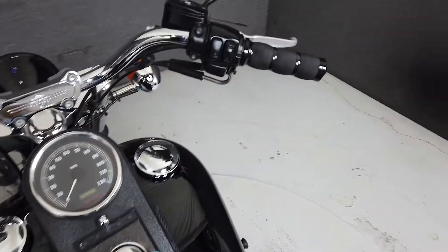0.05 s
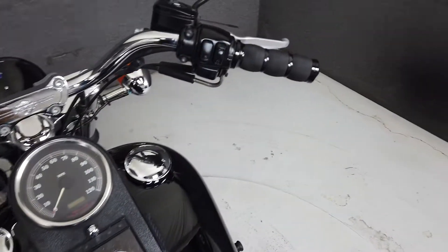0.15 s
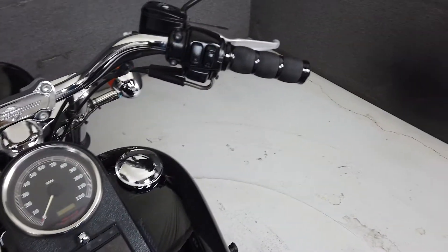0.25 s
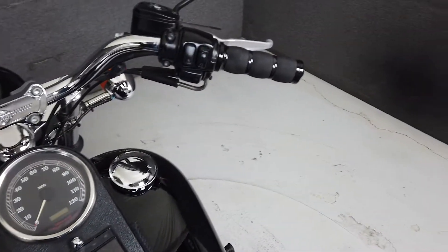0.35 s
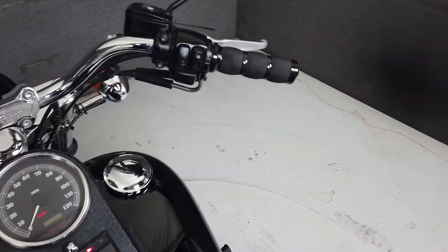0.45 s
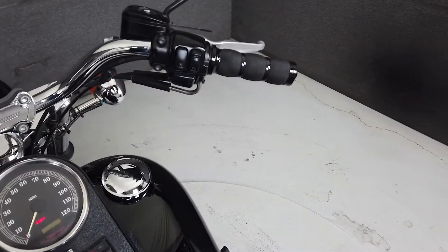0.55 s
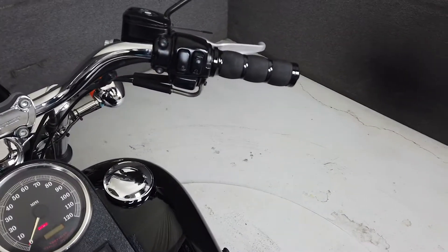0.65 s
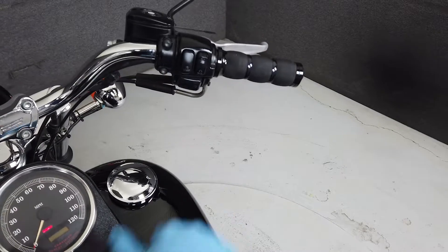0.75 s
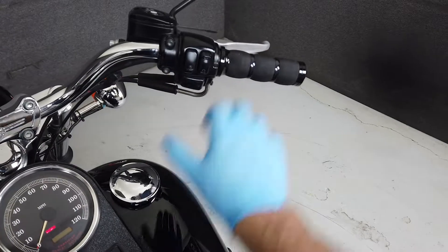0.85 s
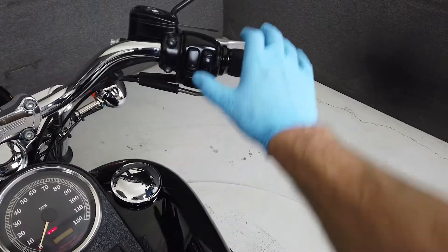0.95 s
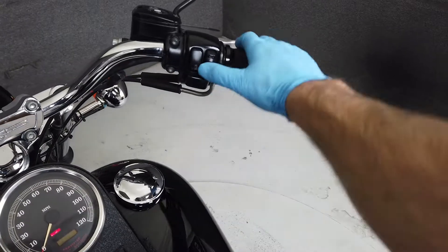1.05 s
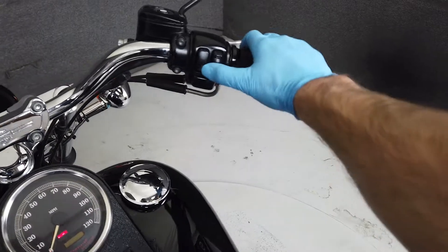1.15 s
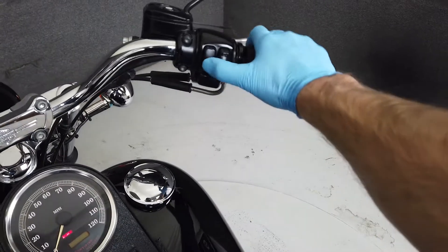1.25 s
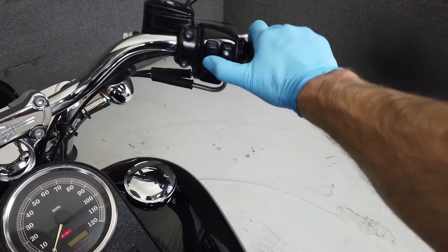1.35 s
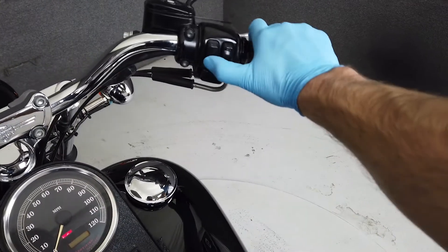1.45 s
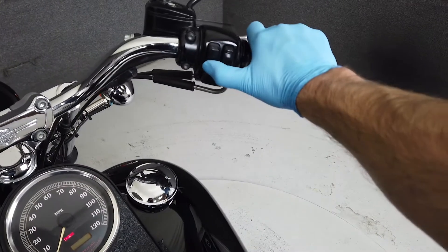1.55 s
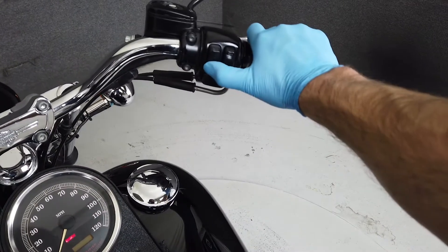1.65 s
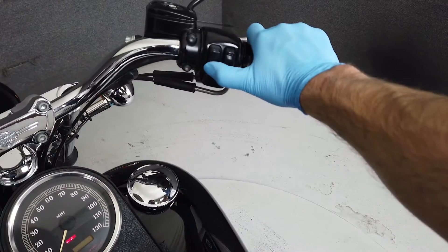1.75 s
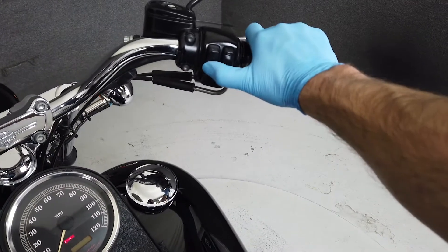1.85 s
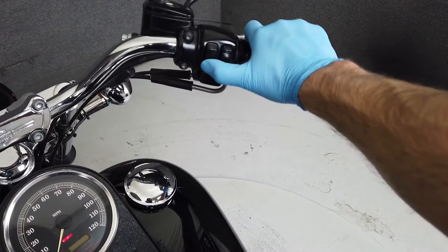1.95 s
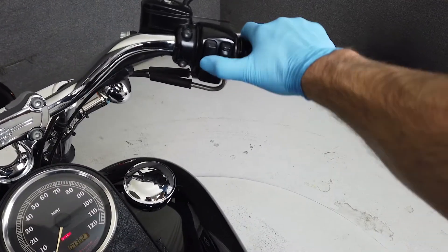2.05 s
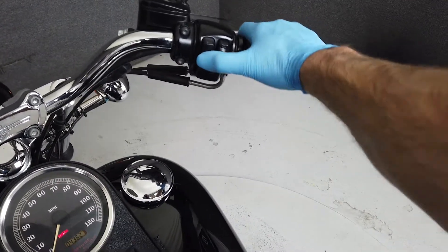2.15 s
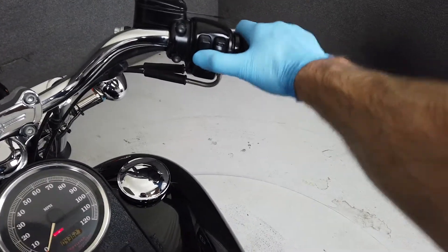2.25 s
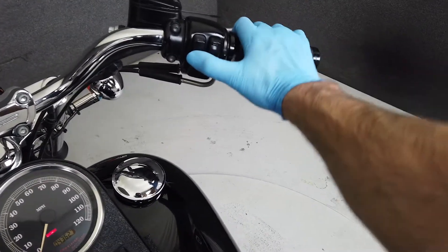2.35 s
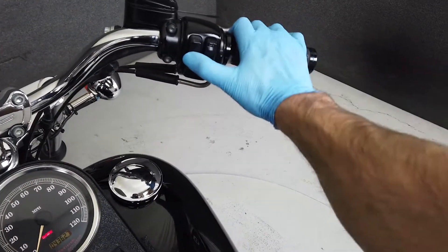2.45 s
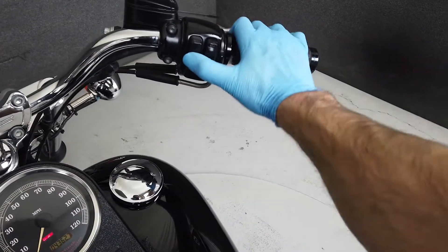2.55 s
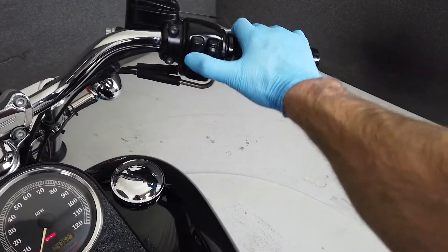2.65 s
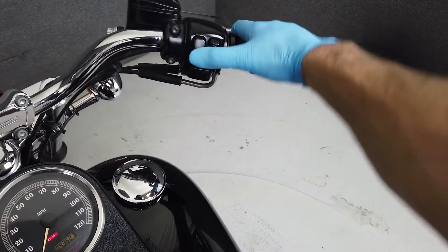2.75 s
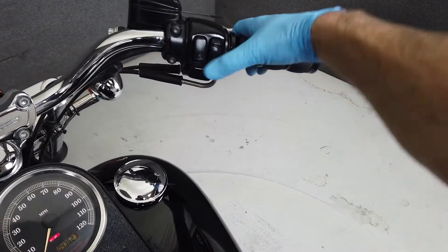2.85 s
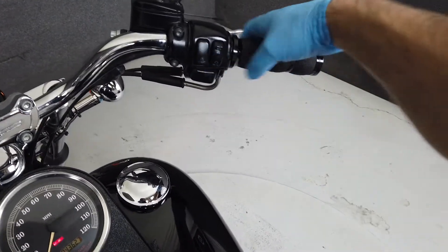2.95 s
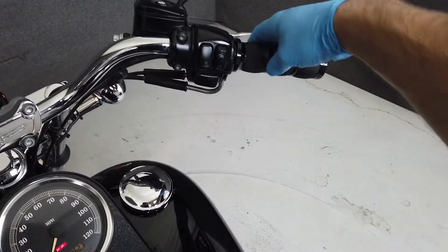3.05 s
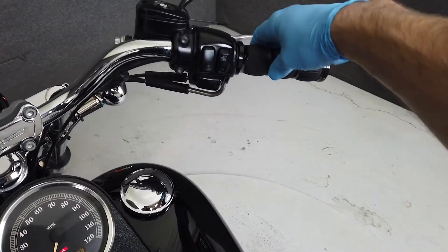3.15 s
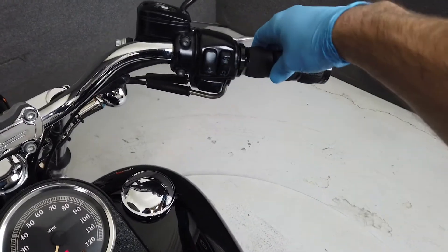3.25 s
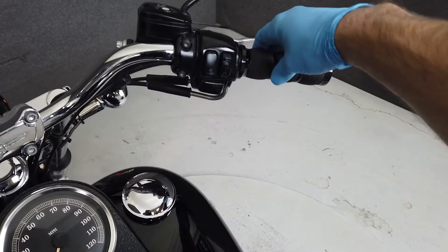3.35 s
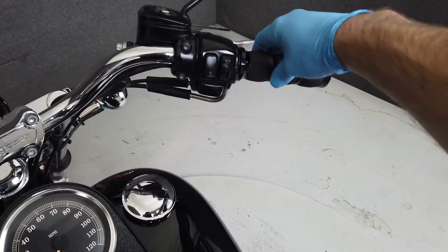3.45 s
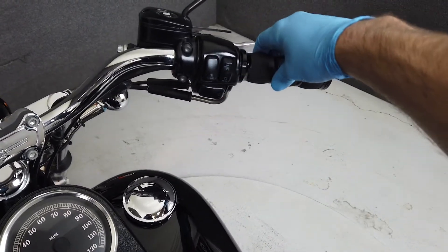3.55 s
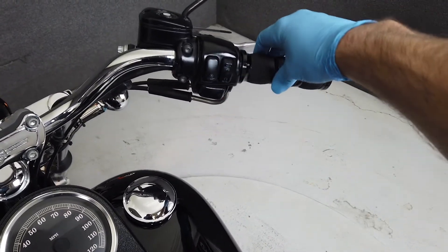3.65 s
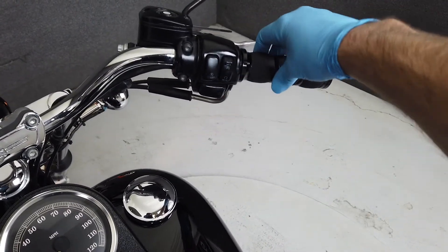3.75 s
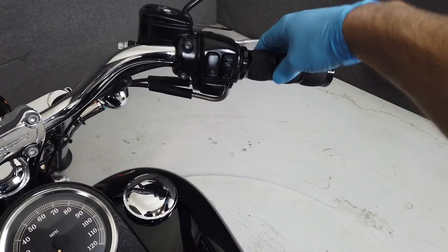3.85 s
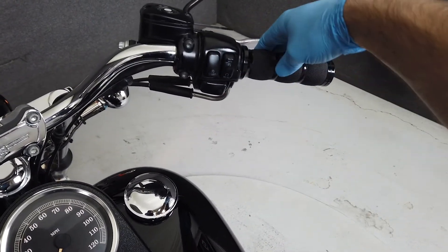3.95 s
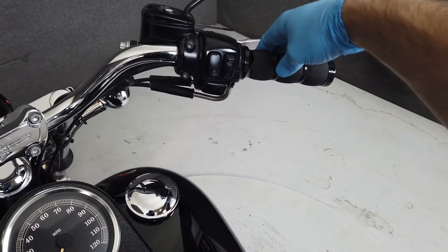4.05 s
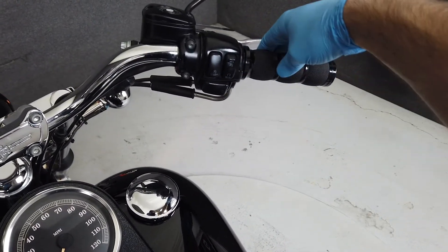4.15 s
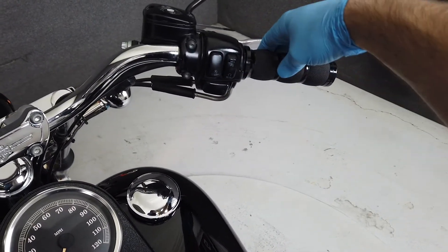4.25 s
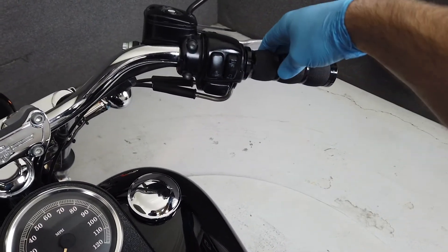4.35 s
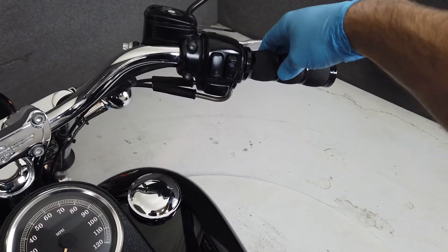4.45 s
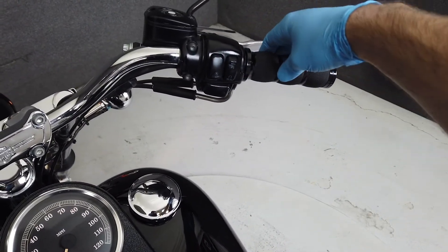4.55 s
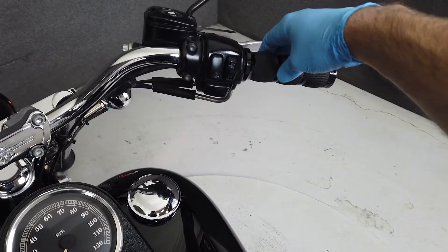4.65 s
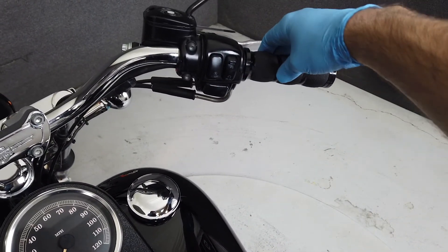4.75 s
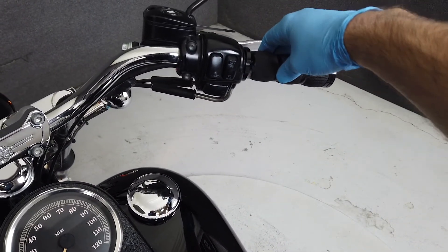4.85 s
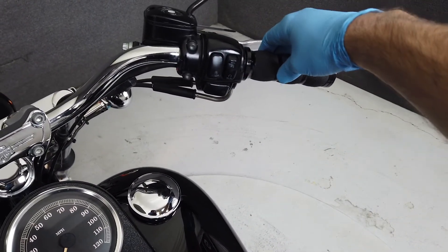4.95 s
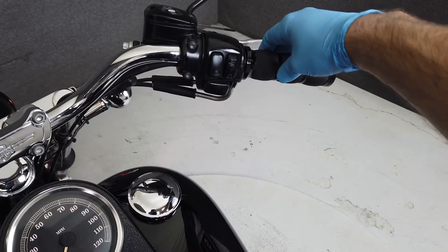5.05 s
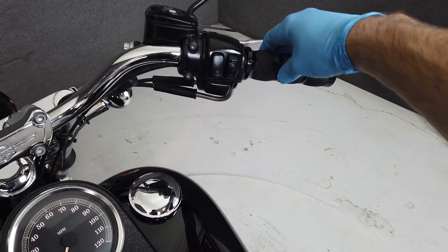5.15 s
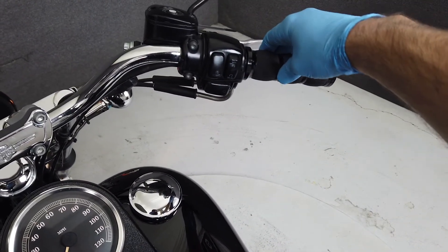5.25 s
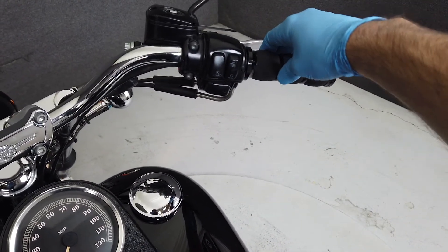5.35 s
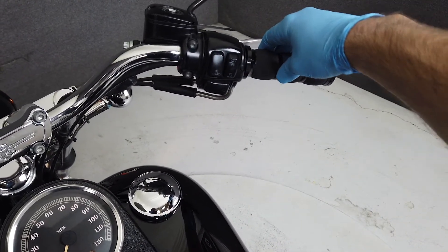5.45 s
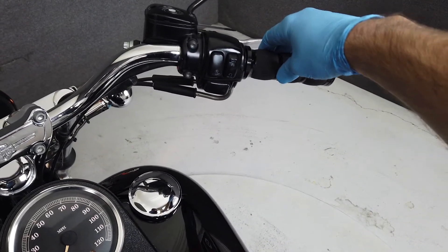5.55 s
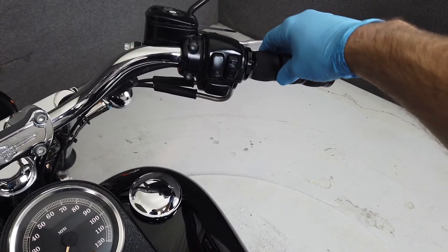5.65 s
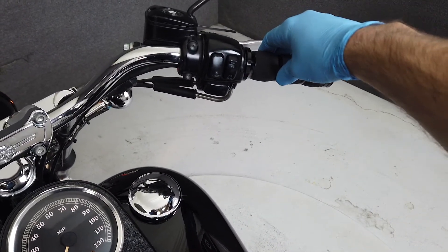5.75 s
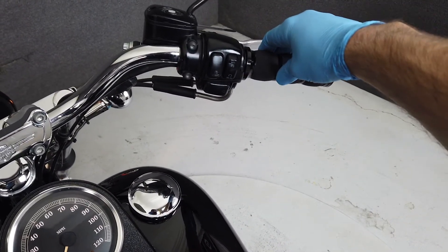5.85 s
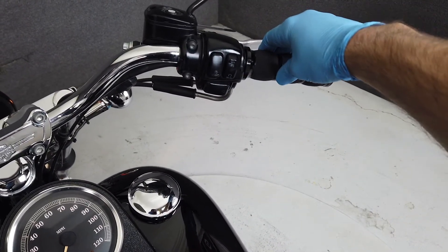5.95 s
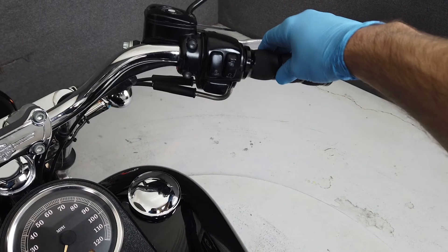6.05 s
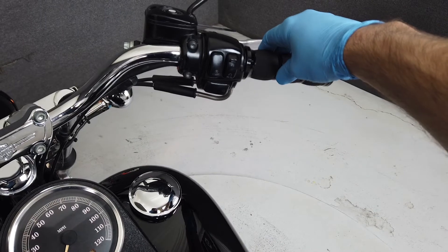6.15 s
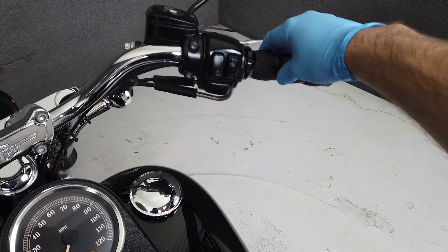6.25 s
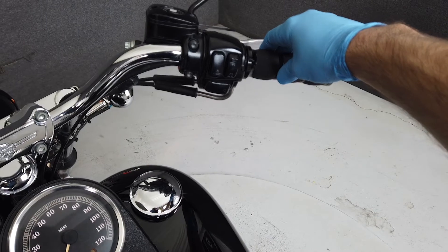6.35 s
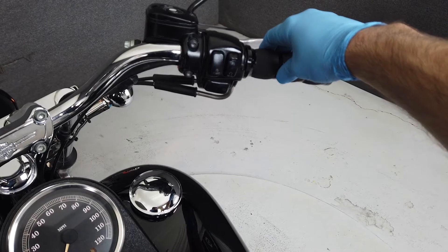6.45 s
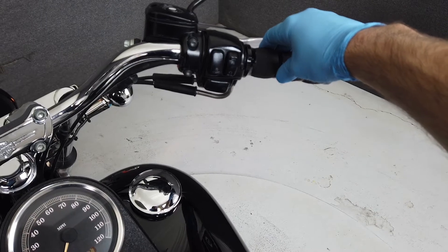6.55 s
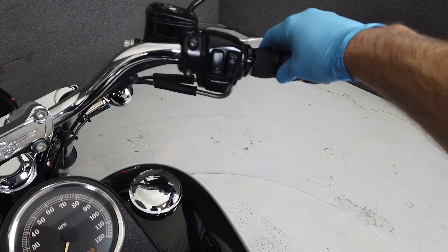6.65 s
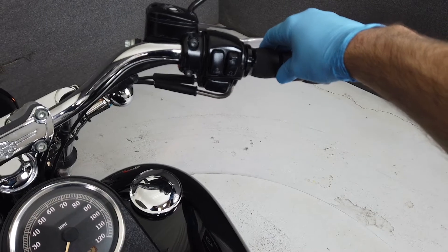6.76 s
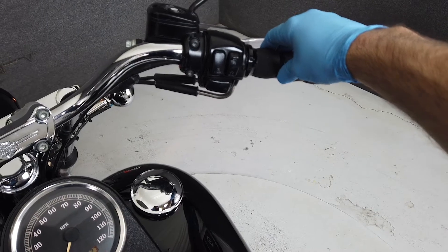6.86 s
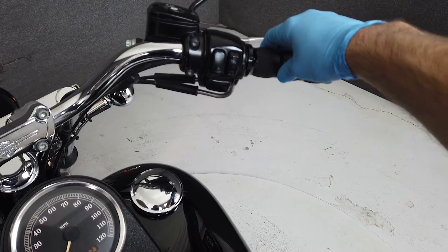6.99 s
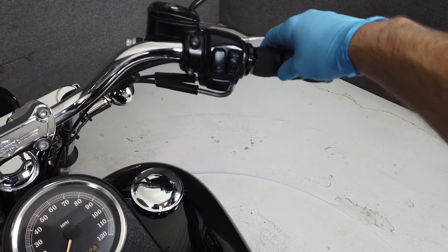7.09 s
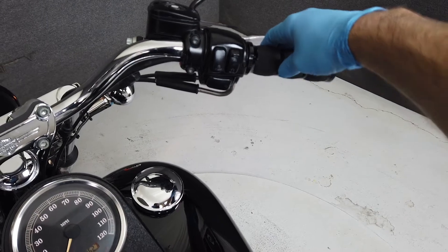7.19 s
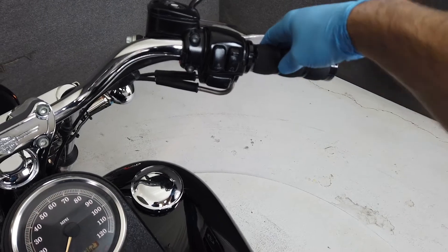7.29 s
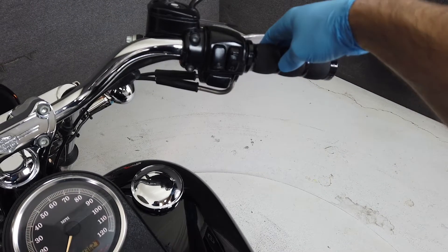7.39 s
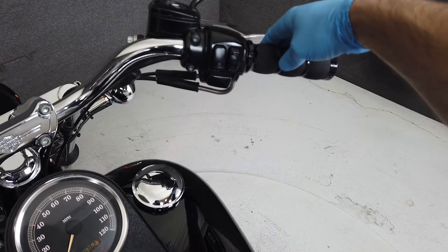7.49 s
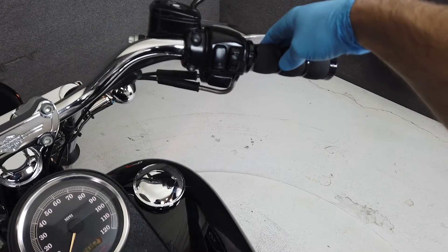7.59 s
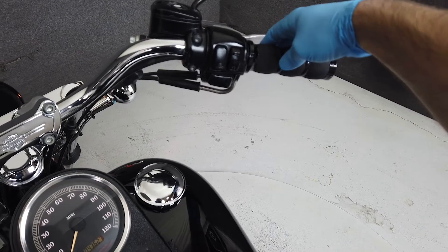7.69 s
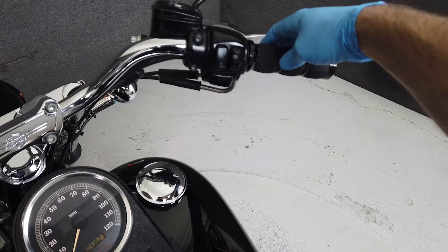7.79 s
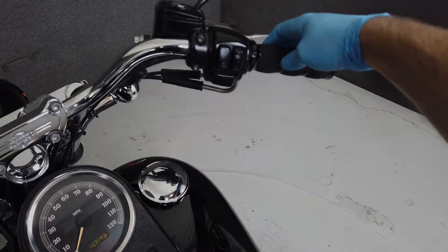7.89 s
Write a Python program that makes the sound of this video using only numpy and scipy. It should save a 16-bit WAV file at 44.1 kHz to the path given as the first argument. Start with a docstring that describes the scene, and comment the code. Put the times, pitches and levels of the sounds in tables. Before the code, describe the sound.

Heard close up from the rider's seat in a workshop, a big V-twin motorcycle is started. A faint click and a hissing pump whirr come first, then a clunk. The starter grinds for about a second until the engine fires with a loud, thumping exhaust. One short rev follows, then a slower one that misfires and rattles as it rises, and the engine falls back toward idle.

```python
"""Motorcycle starting up in a shop

A big V-twin heard from the saddle. The fuel pump primes with a whirr and a hiss, and something clunks on the bike.
The starter whines as it cranks; the engine coughs, catches and flares, then is revved twice, stumbling on the way up.
Every firing is a thump in the exhaust, a ring of pipe and room, and a bark of rushing gas made from noise.
"""
import sys
import numpy as np
from scipy import signal
from scipy.fft import rfft, irfft
from scipy.io import wavfile

SR = 44100
rng = np.random.default_rng(int(sys.argv[2]) if len(sys.argv) > 2 else 0)


def file_out(sig):
    """Save sig as 16-bit WAV at sys.argv[1]."""
    # one column per channel
    cols = np.atleast_2d(sig).T
    # limit, then scale
    lim = np.clip(cols, -1, 1)
    pcm = np.round(lim * 32767).astype(np.int16)
    wavfile.write(sys.argv[1], SR, pcm)


N = 349488   # length in samples
TIME = np.arange(N) / SR
HALF_SECOND = TIME[:SR // 2]

# In all tables of colour and of resonances, the dB only compare the rows with each other.


def from_db(db):
    """Turn decibels into a plain factor."""
    return 10 ** (np.asarray(db) / 20)


def rms_one(x):
    """Scale a sound to an average (rms) level of 1."""
    return x / np.sqrt(np.mean(x ** 2) + 1e-20)


def unit_energy(x):
    """Scale a short sound so that its squared samples add up to 1, averaged over channels."""
    return x / np.sqrt(np.mean(np.sum(x ** 2, axis=-1)))


def in_time(rows, at=TIME):
    """Read each column of a curve at the given times; the first column is seconds."""
    seconds, *columns = np.transpose(rows)
    return [np.interp(at, seconds, column) for column in columns]


def at_hz(points, hz):
    """Read a curve over frequency, with straight lines on a logarithmic scale."""
    point_hz, value = np.transpose(points)
    return np.interp(np.log(hz + 1), np.log(point_hz), value)


# How alike left and right are. Each row: frequency in Hz, likeness from 0 to 1.
LEFT_RIGHT_LIKENESS = [(60, .999), (250, 1), (500, 0.98), (1000, 0.89), (2000, 0.75), (4000, 0.14),
                       (8000, 0.4), (14000, 0.033)]


def noise(colour):
    """Stereo noise of a given colour, less alike in the two channels in most of the treble; rms 1."""
    hz = np.arange(N // 2 + 1) * SR / N
    mid, side = rfft(rng.standard_normal((2, N)))
    alike = np.clip(at_hz(LEFT_RIGHT_LIKENESS, hz), 0, 1)
    bass_fade = np.minimum(hz / colour[0][0], 1) ** 2   # fades below the first row
    gain = from_db(at_hz(colour, hz)) * bass_fade
    stereo = np.sqrt(1 + alike) * mid + np.sqrt(1 - alike) * side * [[1], [-1]]
    return rms_one(irfft(gain * stereo, N))


def drift(per_s):
    """Random wandering with a spread of 1, heading for a new value per_s times a second."""
    return rms_one(np.interp(TIME * per_s, np.arange(N // 10), rng.standard_normal(N // 10)))


def clicks(times, heights):
    """Single-sample pulses at the given seconds."""
    out = np.zeros(N)
    np.add.at(out, np.clip((np.asarray(times) * SR).astype(int), 0, N - 1), heights)
    return out


def convolve(x, response):
    """Start a copy of the response at every sample of x, scaled by it."""
    return signal.fftconvolve(np.atleast_2d(x), np.atleast_2d(response), axes=-1)[:, :N]


def dying(t60):
    """Half a second of decay that falls by 60 dB in t60 seconds."""
    return from_db(-60 * HALF_SECOND / t60)


def resonate(x, modes):
    """Side-by-side resonances of alternating sign, each given as Hz, width in Hz and dB."""
    out = 0
    for k, (hz, width_hz, db) in enumerate(modes):
        r = np.exp(-np.pi * width_hz / SR)
        gain = (-1) ** k * from_db(db) * (1 - r * r) / 2
        out = out + gain * signal.lfilter([1, 0, -1], [1, -2 * r * np.cos(2 * np.pi * hz / SR), r * r], x)
    return out


def swell_in_power(strikes, shape):
    """One envelope for many strikes; where they overlap their power adds up."""
    return np.sqrt(np.abs(convolve(strikes ** 2, shape ** 2)))


def bursts(strikes, shape, colour):
    """Fresh noise under the same envelope for every strike."""
    return noise(colour) * swell_in_power(strikes, shape)


def partials(phase, table, flicker_db):
    """Harmonics of a turning part, each flickering by itself; rms 1."""
    total = 0
    for multiple, db in table:
        level = from_db(db + flicker_db * drift(45))
        left_right_shift = rng.normal(0, 0.098 * multiple, (2, 1))
        total = total + level * np.sin(round(multiple) * phase + left_right_shift)
    return rms_one(total)


def in_shop(x, t60):
    """Many nearby surfaces return the sound, so gliding tones smear and roughen; rms 1."""
    flat = [(100, 0), (16000, 0)]
    return rms_one(convolve(x, noise(flat)[:, :SR // 2] * dying(t60)))


def switched_on(rows):
    """One while a motor's curve lasts, zero before and after."""
    return (TIME >= rows[0][0]) & (TIME <= rows[-1][0])


def ping(s, hz, db, rise_s, t60=0.17):
    """One pure tone swells and dies, as a struck or blown part rings."""
    envelope = (1 - np.exp(-HALF_SECOND / rise_s)) * dying(t60)
    return convolve(clicks([s], [from_db(db)]), envelope * np.sin(2 * np.pi * hz * HALF_SECOND))


def air_modes(modes, cylinder):
    """How the air rings after one firing of the front (0) or rear (1) cylinder."""
    ringing = 0
    for hz, t60, *shares in modes:
        tone = dying(t60) * np.sin(2 * np.pi * hz * HALF_SECOND)
        ringing = ringing + shares[cylinder] * unit_energy(tone)
    return ringing


# Colours of the shop air and of the rustle. Each row: frequency in Hz, level in dB per Hz.
SHOP_COLOUR = [(25, 6), (50, -8), (99, -4), (161, 2.5), (200, -2), (277, -3.5), (489, -3), (600, -9),
               (1000, -11.5), (1610, -14), (2550, -18.5), (4000, -23), (6000, -35.5), (11500, -39.5),
               (16000, -48)]
RUSTLE_COLOUR = [(25, -7), (45, -12), (65, -5), (100, -18), (160, -0.5), (270, -22.5), (420, -15.5),
                 (1000, -25.5), (2000, -27), (4400, -52)]
# Loudness of the rustle of handling. Each row: time in seconds, level in dB.
HANDLING_LEVEL = [(0, -37), (.07, -32.5), (.25, -38), (.5, -40), (.7, -46.5), (1.25, -83), (1.35, -41),
                  (1.45, -57), (1.6, -53)]


def background(hum_hz=160, hum_db=-54.5, air_db=-47.5):
    """Shop air is steady noise with a wavering hum; handling adds a low rustle."""
    waver_db, waver_per_s = 3.5, 25
    phase = 2 * np.pi * np.cumsum(hum_hz * (1 + 0.025 * drift(10))) / SR
    hum = from_db(hum_db + waver_db * drift(waver_per_s)) * np.sin(phase)
    rustle = from_db(in_time(HANDLING_LEVEL)[0]) * noise(RUSTLE_COLOUR)
    return from_db(air_db) * noise(SHOP_COLOUR) + hum + rustle


# The pump spins up, then slows as pressure builds.
# Each row: time in seconds, commutator rate in Hz, level in dB before the whirr and hiss are balanced.
PUMP_RUN = [(.05, 300, -64), (.066, 418, -38.5), (.14, 439, -35.5), (.3, 436, -39), (.42, 427, -43),
            (.55, 430, -50.5), (.59, 298, -59)]
# Whistles of the pump. Each row: multiple of the commutator rate, level in dB.
PUMP_WHISTLES = [(6, -15), (7, -8), (8, -5), (9, -10), (10, 1.5), (11, 6), (12, -9), (16, -2)]
# Colour of the hiss. Each row: frequency in Hz, level in dB per Hz.
PUMP_COLOUR = [(1060, -44), (1800, -16), (2010, -6), (2180, -11), (2590, 1.5), (2870, -10), (3320, -3),
               (4200, -1.5), (4800, 0), (5390, -10), (6900, -13), (8280, -18), (11100, -6.5), (12300, -16),
               (15100, -21), (16000, -29)]


def fuel_pump(buzz_depth=0.21):
    """The pump motor whirrs, and the hiss of fuel pulses at a quarter of its commutator rate."""
    whirr_db, hiss_db = -8.0, 0.0
    hz, db = in_time(PUMP_RUN)
    phase = 2 * np.pi * np.cumsum(hz * (1 + 0.0096 * drift(300))) / SR
    whirr = in_shop(partials(phase, PUMP_WHISTLES, flicker_db=2.5), t60=.2)
    hiss = rms_one((1 + buzz_depth * np.cos(phase / 4)) * noise(PUMP_COLOUR))
    return switched_on(PUMP_RUN) * from_db(db) * (from_db(whirr_db) * whirr + from_db(hiss_db) * hiss)


# Knocks of switch, clunk and solenoid. Each row: time in seconds, strength in dB.
KNOCK_STRIKES = [(.063, -20.5), (.076, -32), (.591, -1.5), (0.609, -12.5), (1.438, -42), (1.456, -10.5)]
# Ringing of the struck metal. Each row: frequency in Hz, level in dB, seconds to fall by 60 dB.
KNOCK_RINGING = [(281, -14, 0.33), (485, 5.5, 0.24), (635, 8, 0.14), (797, 1, 0.18), (995, 2, 0.2),
                 (1130, -13, 0.36), (1210, -5, 0.51), (1640, -23, 0.12), (1880, -9, 0.17), (2010, -3, 0.21),
                 (2720, -18, 0.32)]
# Colour of the knock's noise. Each row: frequency in Hz, level in dB per Hz.
KNOCK_COLOUR = [(88, -52), (150, -14), (196, -37), (262, -10.5), (556, -5), (624, -13), (883, -4.5),
                (972, -1.5), (1320, -16), (1700, -8.5), (2230, -19.5), (4050, -24), (6060, -38),
                (6680, -30.5), (15000, -41)]


def knocks(crack_db=-15.5, crack_t60=0.019, body_db=-22.0, body_t60=0.19,
           tail_db=-18.5, tail_t60=0.34, tail_hz=2000, modes_db=-13.0):
    """Metal parts knock: a crack, ringing modes and a dull tail in the shop."""
    at, db = np.transpose(KNOCK_STRIKES)
    strikes = clicks(at, from_db(db))
    ringing = 0
    for k, (hz, level_db, t60) in enumerate(KNOCK_RINGING):
        tone = np.sin(2 * np.pi * hz * HALF_SECOND)
        ringing = ringing + (-1) ** k * from_db(level_db) * dying(t60) * tone
    hit_shape = from_db(crack_db) * dying(crack_t60) + from_db(body_db) * dying(body_t60)
    hit = bursts(strikes, hit_shape, KNOCK_COLOUR)
    dull = signal.butter(2, tail_hz, fs=SR, output="sos")
    tail = signal.sosfilt(dull, bursts(strikes, from_db(tail_db) * dying(tail_t60), KNOCK_COLOUR))
    return hit + tail + from_db(modes_db) * convolve(strikes, ringing / np.abs(ringing).max())


# Tones of the pump's relay. Each row: frequency in Hz, level in dB.
RELAY_TONES = [(576, -37), (910, -40), (2110, -34.5)]


def pump_relay():
    """The pump's relay rings with the first knock, rising almost at once."""
    return sum(ping(KNOCK_STRIKES[0][0], hz, db, rise_s=0.00042) for hz, db in RELAY_TONES)


# Compression strokes that the starter labours against. Each row: bite in seconds, over the top in seconds,
# gear mesh rate in Hz at the bite, mesh rate in Hz at the top, gear level in dB at the top.
STARTER_STROKES = [(1.55, 1.635, 688.3, 540.8, -23.5), (1.95, 1.995, 524, 485, -29.5),
                   (2.07, 2.175, 456, 403, -30.5), (2.345, 2.45, 490, 410, -30.5),
                   (2.56, 2.6, 536.5, 548, -26.5)]


def starter_effort(inrush_s=0.017, coast_db=-37.0):
    """Rows (s, mesh Hz, gear dB, brush dB): run-up, a swell on each stroke, lighter between, then the coast."""
    on_s, run_up_s, coast_s = 1.437, 0.037, 0.49
    run_up_from_hz, run_up_to_hz, run_up_db, brush_db = 241, 415.3, -25.5, -30
    swell_db = 5.5   # the gears grow louder from bite to top
    freewheel_drop_db, freewheel_gain_hz, bite_s = 13.5, 14, 0.022   # light and fast just before a bite
    ease_s = .045    # past the top the gears quieten in this time, their pitch going on as before
    rows = [(on_s - inrush_s, run_up_from_hz, run_up_db + coast_db, brush_db + coast_db),
            (on_s, run_up_from_hz, run_up_db - swell_db, brush_db),
            (on_s + run_up_s, run_up_to_hz, run_up_db, brush_db)]
    for k, (bite, top, bite_hz, top_hz, db) in enumerate(STARTER_STROKES):
        light_db = db - swell_db
        sag_hz_per_s = (bite_hz - top_hz) / (top - bite)
        if k:
            rows.append((bite - bite_s, bite_hz + freewheel_gain_hz,
                         light_db - freewheel_drop_db, brush_db - freewheel_drop_db))
        rows += [(bite, bite_hz, light_db, brush_db),
                 (top, top_hz, db, brush_db),
                 (top + ease_s, top_hz - sag_hz_per_s * ease_s, light_db, brush_db - freewheel_drop_db / 2)]
    rows.append((top + coast_s, run_up_to_hz, db + coast_db, brush_db + coast_db))
    return sorted(rows)


# Gear whine. Each row: multiple of half the mesh rate, level in dB.
GEAR_WHINE = [(1, -4), (2, -1), (3, -4), (4, -3), (5, -3), (6, -2), (7, -3), (8, -3), (9, -5), (10, -4),
              (12, -5), (14, -5), (16, -6)]
# Resonances of the starter's housing. Each row: frequency in Hz, width in Hz, level in dB.
STARTER_HOUSING = [(444, 170, 7.5), (1005, 120, 7.5), (1500, 350, 7.5), (2900, 590, 2.5)]
# Colours of the grinding gears and of the brush hiss. Each row: frequency in Hz, level in dB per Hz.
GEAR_COLOUR = [(120, -41), (200, 4), (234, -17), (320, 4.5), (369, 0), (549, -4), (751, -18), (1180, -4),
               (1490, -15), (2700, -8), (6000, -15), (7800, -61), (13200, -120)]
BRUSH_COLOUR = [(3000, 10), (5000, -1), (7000, 0.5), (9500, 4.5), (11500, 5), (13000, -8), (16000, -11)]


def starter(brush_db=-7.5, grain_db=0.5, tooth_depth=0.79):
    """The gears whine and grind at the rate their teeth meet; the brushes hiss under load."""
    whine_db, echo_db, grind_db, wobble, smear_t60 = -3.0, -6.5, -8.0, .012, .08
    effort = starter_effort()
    mesh_hz, gear_db, hiss_db = in_time(effort)
    phase = 2 * np.pi * np.cumsum(mesh_hz * (1 + wobble * drift(150))) / SR
    whine = rms_one(resonate(partials(phase / 2, GEAR_WHINE, flicker_db=6.0), STARTER_HOUSING))
    teeth = (1 + tooth_depth * np.cos(phase)) * from_db(grain_db * drift(240))
    grind = rms_one(teeth * noise(GEAR_COLOUR))
    echo = in_shop(whine, smear_t60)
    gears = from_db(whine_db) * whine + from_db(echo_db) * echo + from_db(grind_db) * grind
    hiss = rms_one(teeth * noise(BRUSH_COLOUR))
    return switched_on(effort) * (from_db(gear_db) * gears + from_db(hiss_db + brush_db) * hiss)


# Colour of rushing gas, also the grit of the rasps. Each row: frequency in Hz, level in dB per Hz.
GAS_COLOUR = [(200, 6), (300, 3.5), (338, 1.5), (395, 3.5), (640, 5), (708, -5), (750, 0.5), (1000, -2.5),
              (1550, -1), (1850, -6), (2400, -4.5), (2900, -6.5), (3600, -9), (5500, -18), (8500, -19),
              (11300, -14), (13000, -21.5), (16000, -29)]
# Rasps of the starter drive. Each row: start in seconds, length in seconds, frequency in Hz, width in Hz,
# level in dB before a smooth swell and fade.
DRIVE_RASPS = [(1.458, 0.036, 960, 500, -24), (1.613, 0.052, 1010, 450, -26),
               (2.136, 0.065, 1800, 400, -38), (2.138, 0.065, 2950, 450, -39),
               (2.426, 0.054, 1620, 200, -32), (2.42, 0.061, 2900, 400, -39),
               (2.649, 0.031, 2360, 200, -22)]


def rasps():
    """The starter drive gnashes as it takes up load, and its clutch rasps as the engine runs away from it."""
    out, grit = np.zeros((2, N)), noise(GAS_COLOUR)
    for s, length_s, hz, width_hz, db in DRIVE_RASPS:
        span = slice(int(s * SR), int((s + length_s) * SR))
        rasp = rms_one(resonate(grit[:, span], [(hz, width_hz, 0)]))
        out[:, span] += from_db(db) * rasp * np.sin(np.linspace(0, np.pi, rasp.shape[1]))
    return out


# Engine speed from the moment it catches. Each row: time in seconds, four-stroke cycles per second.
ENGINE_SPEED = [(2.647, 8.73), (2.82, 18.33), (3.069, 14.55), (3.258, 10.42), (3.386, 8.56), (3.765, 15.83),
                (3.944, 22.79), (4.131, 20.17), (4.503, 11.35), (4.793, 8.91), (5.095, 11.64),
                (5.444, 11.43), (5.589, 13.17), (5.782, 12.71), (6.389, 13.99), (7.054, 19.14),
                (7.282, 23.74), (7.92, 11.17)]
CATCH_S = ENGINE_SPEED[0][0]
IDLE_HZ = 12   # cycles per second


def speed_at(s):
    """Engine speed in cycles per second; zero before it catches."""
    return np.interp(s, *np.transpose(ENGINE_SPEED), left=0)


# The flare on catching and two twists of the throttle.
# Each row: opens in seconds, time to open fully in seconds, shuts in seconds, opening from 0 to 1.
THROTTLE_TWISTS = [(2.6, .02, 2.886, 0.86), (3.42, 0.3, 3.997, 1), (4.84, 0.25, 7.25, 1.0)]


def throttle_at(s, release_s=0.0084):
    """The throttle is rolled on and springs shut; 0-1."""
    total = 0
    for opens, roll_s, shuts, opening in THROTTLE_TWISTS:
        rolled_on = np.clip((s - opens) / roll_s, 0, 1)
        total = total + opening * rolled_on * np.exp(-np.maximum(s - shuts, 0) / release_s)
    return np.clip(total, 0, 1)


# How loudness follows throttle and speed, for thump, pipe ring and bark. Each holds: dB at idle speed when shut,
# its rise in dB per octave of speed, dB at idle speed when open, its rise in dB per octave.
THUMP_LOUDNESS = (-22.5, 10.5, -17, 6)
RING_LOUDNESS = (-34, 14, -27, 13)
BARK_LOUDNESS = (-42, 12, -27.3, 3.5)
# Misfires, mostly of the rear cylinder, while the revs hang low. Each row: time in seconds, bark change in dB.
WEAK_FIRINGS = [(3.385, -2), (3.613, 0), (5.132, -6), (5.305, -43), (5.392, -27), (5.713, -29),
                (5.757, -29), (5.99, -10), (6.023, -27), (6.098, -31), (6.172, -5.5), (6.318, -12),
                (6.593, -4), (7.667, -7), (7.835, -15)]
# Firings with a level of their own, mostly harder: on catching, as the throttle opens, after misfires.
# Each row: time in seconds, bark change in dB.
UNUSUAL_FIRINGS = [(2.647, 10.5), (2.691, 6.5), (2.736, 9.5), (3.278, 6.5), (3.434, 8), (3.49, 8.5),
                   (3.654, -0.5), (4.696, 10), (4.851, 9), (5.005, 6), (5.046, -0.5), (5.222, -0.5),
                   (5.353, -2), (5.441, -1), (5.525, 2.5), (5.679, 2), (5.948, 2.5), (6.064, 3.5),
                   (6.14, 1), (6.359, 0), (6.39, 3.5), (6.499, 5.5), (6.867, 4.5)]


def firing_levels(at, rear):
    """(thump, ring, bark) dB of each firing: set by throttle and speed, with changes for single firings."""
    rear_weak_db, rear_clears_octaves = -3.5, 0.26   # weak rear burning at idle speed; gone this far above it
    throttle, octaves = throttle_at(at), np.log2(speed_at(at) / IDLE_HZ)
    levels = []
    for shut_db, shut_rise, open_db, open_rise in (THUMP_LOUDNESS, RING_LOUDNESS, BARK_LOUDNESS):
        when_shut, when_open = shut_db + shut_rise * octaves, open_db + open_rise * octaves
        levels.append((1 - throttle) * when_shut + throttle * when_open)
    db = np.array(levels)
    db[2] += rear_weak_db * rear * throttle * np.clip(1 - octaves / rear_clears_octaves, 0, 1)
    # the thump takes only a share of each change, and the ring half of any rise
    for table, thump_share in ((WEAK_FIRINGS, 0.28), (UNUSUAL_FIRINGS, 0.33)):
        for when, change_db in table:
            ring_share = 1 if change_db < 0 else .5
            db[:, np.argmin(np.abs(at - when))] += change_db * np.array([thump_share, ring_share, 1])
    return db


# Coughs and compression puffs while cranking, all shifted by cough_db below.
# Each row: time in seconds, thump in dB, pipe ring in dB, bark in dB.
CRANKING_COUGHS = [(1.709, -22.5, -52, -22.5), (1.737, -22, -25, -27.5), (1.787, -22.5, -29, -25.5),
                   (1.911, -30.5, -51, -40.5), (2.033, -34, -44, -40), (2.212, -20.5, -31.5, -25.5),
                   (2.312, -31.5, -40.5, -62), (2.482, -22.5, -59, -27), (2.532, -40, -40, -33),
                   (2.577, -25, -27, -25.5), (2.61, -46, -43, -40)]


def firings(rear_bark_db=2.5, bark_spread_db=2.5, cough_db=-14.5):
    """Times, cylinder and (thump, ring, bark) strengths; the V makes the beat uneven, and revs steady it."""
    spread_db, jitter_s = 1.8, .00025
    rear_lag = 315 / 720   # of a cycle, behind the front cylinder
    running = TIME[TIME >= CATCH_S]
    turned = np.cumsum(speed_at(running)) / SR   # cycles so far
    number = np.arange(2 * int(turned[-1]) + 1)
    rear = number % 2
    at = np.interp(number // 2 + rear * rear_lag, turned, running)
    speed = speed_at(at)
    chance = rng.standard_normal((len(at), 4)) * np.minimum(IDLE_HZ / speed, 1)[:, None] ** 2
    db = firing_levels(at, rear) + chance[:, 1:].T * [[spread_db], [spread_db], [bark_spread_db]]
    db[2] += rear_bark_db * (rear - .5)
    strength = from_db(db) / np.sqrt(2 * speed)   # the power is shared among the firings of a second
    cough_at, *cough_levels = np.transpose(CRANKING_COUGHS)
    strength = np.hstack([from_db(np.array(cough_levels) + cough_db), strength])
    all_at = np.r_[cough_at, at + jitter_s * chance[:, 0]]
    return all_at, np.r_[np.zeros(len(cough_at)), rear], strength * np.sqrt(SR)


# The shaking of the bike. Each row: frequency in Hz, level in dB.
SHUDDER_TONES = [(33, 0), (47, 1), (86, -3)]


def shudder(level_db=-4.5, t60=0.62):
    """Each cough rocks the whole bike, and the lowest boom lingers."""
    at, thump_db = np.transpose(CRANKING_COUGHS)[:2]
    shaking = sum(from_db(db) * np.sin(2 * np.pi * hz * HALF_SECOND) for hz, db in SHUDDER_TONES)
    return from_db(level_db) * convolve(clicks(at, from_db(thump_db)), dying(t60) * shaking)


# Colour of tappets and chain. Each row: frequency in Hz, level in dB per Hz.
CLATTER_COLOUR = [(400, 34.5), (1500, 23), (3000, 11), (5500, 4.5), (8500, 10), (11300, -13), (13000, -33),
                  (16000, -26)]


def valve_train(level_db=-35.0, grain_db=-1.0, growth=1.65, steady=0.67, tick_t60=0.021, tick_spread_db=1.5):
    """Four tappets tick each cycle over the clatter of the chain, louder as the engine turns faster."""
    turned = np.cumsum(speed_at(TIME)) / SR
    closing = np.diff(np.floor(4 * turned), prepend=0)   # one at each tick, else zero
    ticks = convolve(closing * from_db(tick_spread_db * rng.standard_normal(N)), dying(tick_t60))
    loudness = (speed_at(TIME) / IDLE_HZ) ** growth * from_db(level_db + grain_db * drift(280))
    return loudness * (steady + ticks) * noise(CLATTER_COLOUR)


# Ringing of pipes and heat shields. Each row: frequency in Hz, level in dB.
CLANK_MODES = [(520, 3), (740, -5), (885, -5), (1030, -6), (1200, 4), (1374, -4), (1523, 4.5), (1640, -9),
               (1809, -10), (2083, 3.5), (2553, -1), (2826, 6), (2978, -3), (3200, -10)]


def clank(at, strength, level_db=-17.0, late_s=.012):
    """Every firing shakes loose metal: each mode rings a little late, with its own strength and slight detuning."""
    t60, spread_db, detune = .11, 5.5, .025
    hz, db = np.transpose(CLANK_MODES)
    t, out = TIME[:SR // 10], np.zeros((2, N + SR))
    decay = unit_energy(dying(t60)[:len(t)])
    # a phase shift between left and right makes them as unlike as the noise is
    shifts = np.arccos(np.clip(at_hz(LEFT_RIGHT_LIKENESS, hz), 0, 1)) / 2
    for mode_hz, mode_db, shift in zip(hz, db, shifts):
        for s, height, (late, loud, sharp) in zip(at, strength, rng.standard_normal((len(at), 3))):
            start = int((s + late_s * abs(late) / 2) * SR)
            phase = 2 * np.pi * mode_hz * (1 + detune * sharp) * t
            wave = np.sin(phase + np.array([[shift], [-shift]]) * np.sign(late))
            out[:, start:start + len(t)] += height * from_db(mode_db + spread_db * min(loud, 1.5)) * decay * wave
    return from_db(level_db) * out[:, :N]


# Loud single rattles. Each row: time in seconds, frequency in Hz, level in dB.
SINGLE_RATTLES = [(2.652, 2300, -22), (5.528, 3300, -31), (5.572, 1864, -24), (5.61, 2930, -26),
                  (6.072, 3110, -29), (6.385, 1885, -26), (6.782, 3005, -24), (6.865, 1553, -20),
                  (6.872, 3070, -24), (7.008, 3070, -23), (7.137, 1540, -22)]


def rattles():
    """Loose metal rings now and then with a short, high tone."""
    return sum(ping(s, hz, db, rise_s=0.0016, t60=0.11) for s, hz, db in SINGLE_RATTLES)


# Firings that honk in a pipe. Each row: time in seconds, frequency in Hz, level in dB.
PIPE_HONKS = [(5.873, 452, -17), (6.25, 468, -14.5), (6.39, 520, -16), (6.661, 554.4, -23),
              (7.295, 491, -11)]


def honks():
    """A few firings set one tone of a pipe swelling."""
    return sum(ping(s, hz, db, rise_s=0.0093) for s, hz, db in PIPE_HONKS)


# Brief growls as the throttle snaps shut. Each row: middle in seconds, half length in seconds, level in dB.
SHUT_GROWLS = [(2.865, 0.027, -17.5), (3.97, 0.03, -20), (7.323, 0.043, -17)]
# Throat of the pipes. Each row: frequency in Hz, width in Hz, level in dB.
GROWL_THROAT = [(223, 94, 7.5), (307, 12, 12), (383, 13, 10.5), (480, 20, -6), (529, 65, -17),
                (754, 35, -3)]


def growl(at, flutter_t60=0.15):
    """Charges fired as the throttle shuts rattle the throat of the pipes."""
    flutter = .25
    swell = sum(from_db(db) * np.exp(-((at - s) / half_s) ** 2) for s, half_s, db in SHUT_GROWLS)
    strikes = clicks(at, swell * np.sqrt(SR / (2 * np.maximum(speed_at(at), IDLE_HZ))))
    turbulence = rng.standard_normal(N) * swell_in_power(strikes, unit_energy(dying(flutter_t60)))
    return convolve(strikes + flutter * turbulence, unit_energy(resonate(dying(0.0029), GROWL_THROAT)))


# Air in and around the pipes. Each row: frequency in Hz, seconds to fall by 60 dB,
# share driven by the front cylinder, share driven by the rear one; negative when inverted.
PIPE_MODES = [(229, 0.094, -0.62, -0.31), (239.8, 0.46, 0.36, 0.025), (254.2, 0.27, 0.41, 0.192),
              (282.4, 0.41, 0.28, -0.16), (303, 0.37, -0.15, 0.34), (357, 0.58, -0.045, -0.045),
              (388.6, 0.1, -0.17, 0.14), (472, 0.13, -0.064, -0.024), (518.4, 0.2, 0.23, -0.18),
              (553, 0.51, 0.046, 0.17), (612, 0.092, 0.084, -0.011), (750.5, 0.098, -0.12, -0.011),
              (859, 0.072, 0.075, -0.033)]


def exhaust(at, rear, ring, ring_db=1.5, travel_s=0.00212):
    """Firings and a little turbulence ring the air in the pipes; the engine's harmonics glide through the modes."""
    flutter, flutter_t60 = .25, .14
    out = 0
    for cylinder in range(2):
        strikes = clicks(at + travel_s, ring * (rear == cylinder))
        turbulence = rng.standard_normal(N) * swell_in_power(strikes, unit_energy(dying(flutter_t60)))
        out = out + convolve(strikes + flutter * turbulence, air_modes(PIPE_MODES, cylinder))
    return from_db(ring_db) * out


def bark(at, rear, strength, open_s=0.033, room_db=-2.0, fresh_db=-0.5, steady_db=-1.5, grit_db=2.0,
         rise_s=0.0017):
    """Gas cracks out and rushes while the valve is open: part fresh turbulence, part each pipe's own echoes."""
    crack_db, crack_t60, room_t60 = -7.0, .008, .55
    rush = 1 / (1 + (HALF_SECOND / open_s) ** 4)
    shape = unit_energy(from_db(crack_db) * dying(crack_t60) + rush + from_db(room_db) * dying(room_t60))
    shape = shape * (1 - np.exp(-HALF_SECOND / rise_s))
    grit = from_db(fresh_db + grit_db * drift(700))
    out = grit * bursts(clicks(at, strength), shape, GAS_COLOUR)
    for cylinder in range(2):
        echoes = unit_energy(noise(GAS_COLOUR)[:, :len(shape)] * shape)   # the same at every firing
        out = out + from_db(steady_db) * convolve(clicks(at, strength * (rear == cylinder)), echoes)
    return out


# Room boom. Each row: frequency in Hz, seconds to fall by 60 dB, share driven by the front pipe,
# share driven by the rear pipe; negative when inverted.
ROOM_BOOM = [(41, 0.38, 0.16, 0.075), (67.3, 0.342, 0.14, 0.2), (81.7, 0.21, 0.2, -0.074),
             (93, 0.25, -0.065, -0.32), (105, 0.088, -0.23, 0.11), (147, 0.46, -0.14, 0.045),
             (168.3, 0.14, 0.29, 0.33), (187.5, 0.18, 0.029, -0.22)]
# Direct sound and reflections from floor and walls. Each row: delay in seconds, share (negative when inverted).
WALL_ECHOES = [(0, 0.98), (0.0127, 0.38), (0.0141, -0.27), (.0304, .08), (0.0455, 0.15)]


def thumps(at, rear, strength, puff_s=.0013, return_s=0.0038, suction=2.7, rebound=1.32,
           shut_return_s=0.0045, shut_suction=2.5, rear_widening=1.176, puff_db=-0.1, rear_db=-4.0,
           boom_db=0.0, side_db=-33.5):
    """Each puff draws a suction after it: deep, rebounding under throttle, shallower when shut. The room booms along."""
    flow, t = np.zeros(N + SR), TIME[:SR // 20]
    loads = np.where(at < CATCH_S, .25, np.minimum(2 * throttle_at(at), 1))
    heights = strength * from_db(puff_db + rear_db * rear)
    under_load = np.array([return_s, suction, rebound])
    when_shut = np.array([shut_return_s, shut_suction, 0])
    for start, height, load, widening in zip((at * SR).astype(int), heights, loads, rear_widening ** rear):
        gap, dip, swing = load * under_load + (1 - load) * when_shut
        wave = 0
        for k, share in enumerate([1, -dip, swing]):   # puff, suction, rebound
            middle = np.pi / 2 * puff_s + k * gap
            wave = wave + share * np.exp(-.5 * ((t / widening - middle) / puff_s) ** 2)
        flow[start:start + len(t)] += height * unit_energy(wave)
    boom = sum(convolve(clicks(at, strength * (rear == cylinder)), air_modes(ROOM_BOOM, cylinder))
               for cylinder in range(2))
    echoes = clicks(*np.transpose(WALL_ECHOES))[:SR // 2]
    mid = convolve(flow[:N], echoes) + from_db(boom_db) * boom
    # a faint copy, 10 ms late and opposite in the two channels, widens the sound
    return mid + from_db(side_db) * np.roll(mid, SR // 100) * [[1], [-1]]


def scene():
    """Add up the shop, the electric parts and the engine."""
    at, rear, (thump, ring, gas) = firings()
    electric = fuel_pump() + pump_relay() + knocks() + starter() + rasps()
    metal = shudder() + valve_train() + clank(at, gas) + rattles()
    pipes = honks() + growl(at) + exhaust(at, rear, ring) + bark(at, rear, gas) + thumps(at, rear, thump)
    return background() + electric + metal + pipes


def record(dry, low_cut_hz=22, top_cut_hz=16000):
    """The deepest bass is lost, peaks are rounded, the top is cut."""
    x = signal.sosfilt(signal.butter(2, low_cut_hz, "high", fs=SR, output="sos"), dry)
    rounded = 1.1 * np.tanh(x / 1.1)
    return signal.sosfilt(signal.ellip(10, .2, 80, top_cut_hz, fs=SR, output="sos"), rounded)


dry = scene()
out = record(dry)
file_out(out)
```